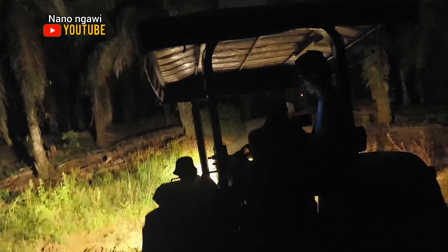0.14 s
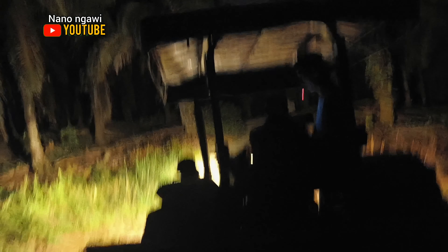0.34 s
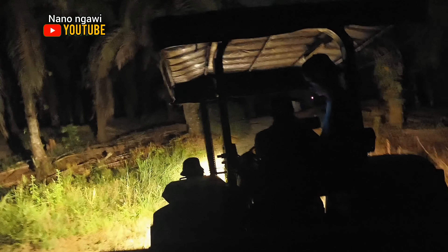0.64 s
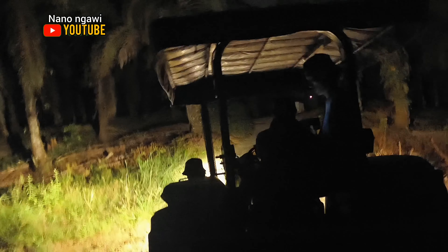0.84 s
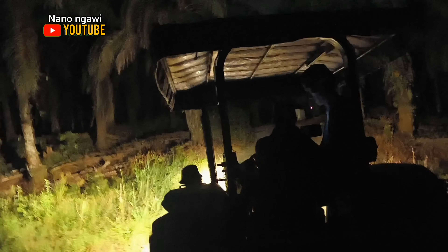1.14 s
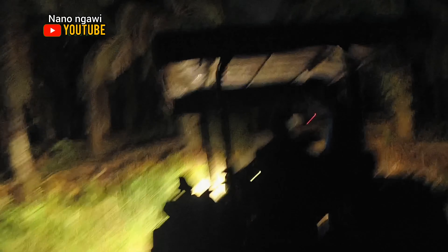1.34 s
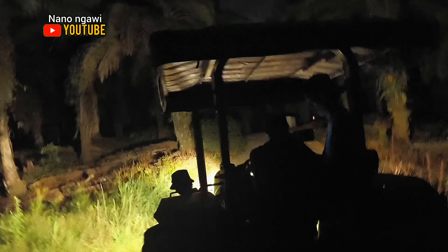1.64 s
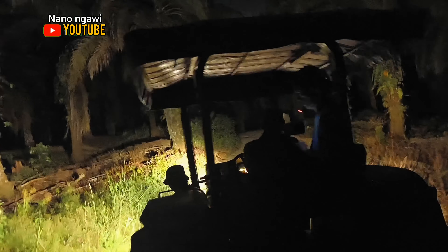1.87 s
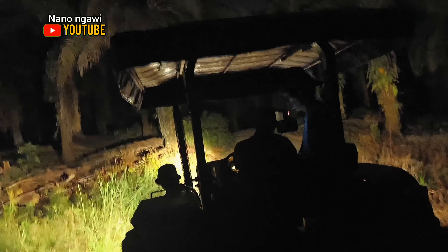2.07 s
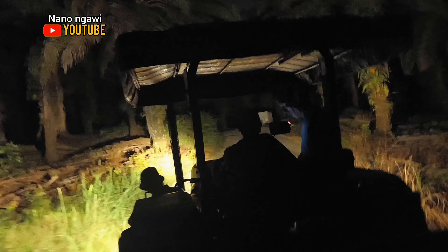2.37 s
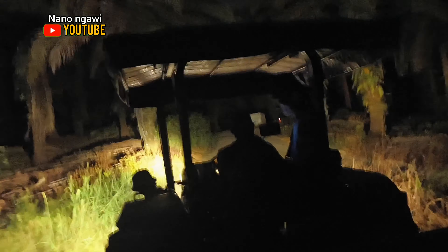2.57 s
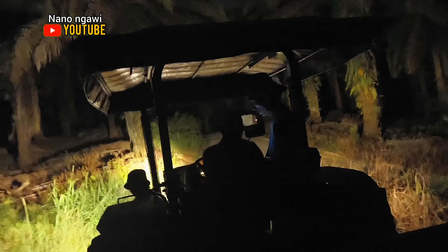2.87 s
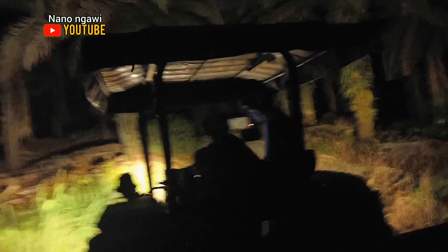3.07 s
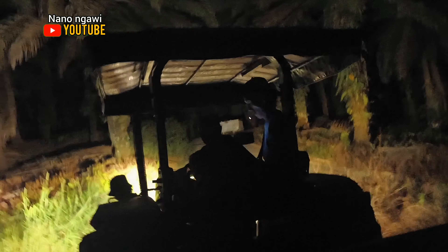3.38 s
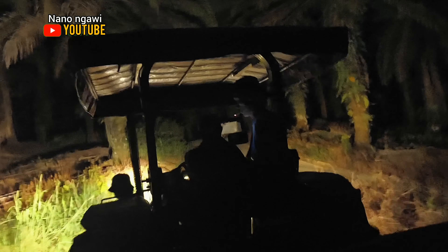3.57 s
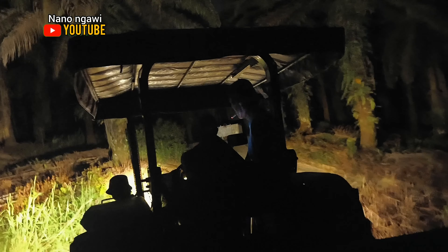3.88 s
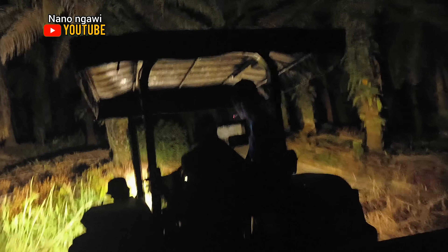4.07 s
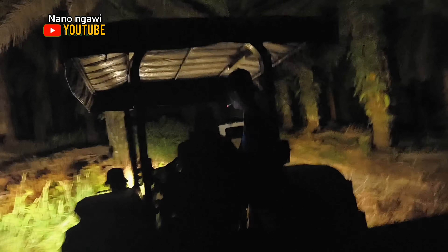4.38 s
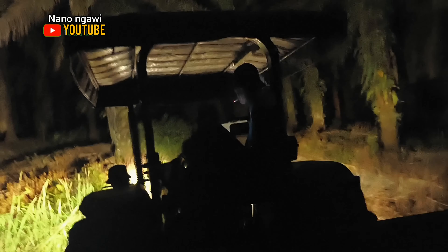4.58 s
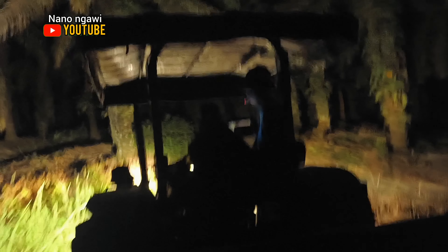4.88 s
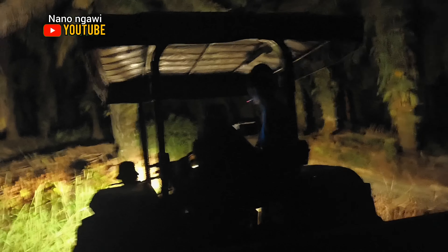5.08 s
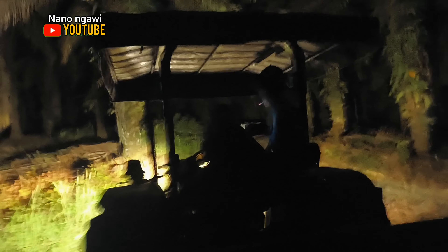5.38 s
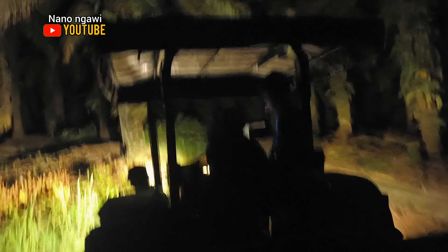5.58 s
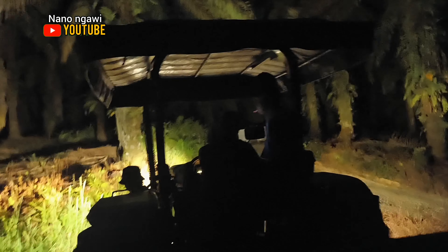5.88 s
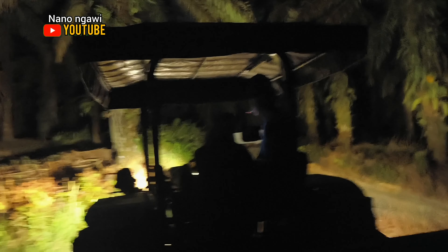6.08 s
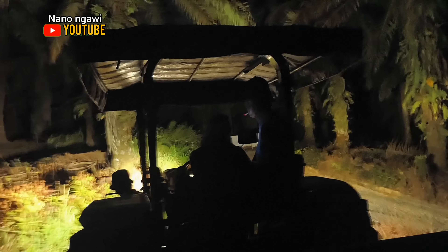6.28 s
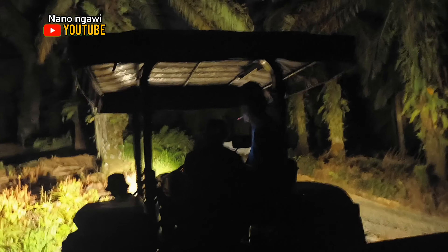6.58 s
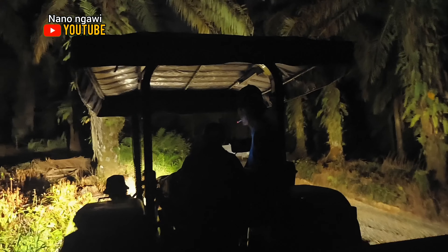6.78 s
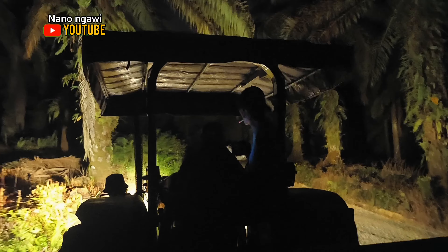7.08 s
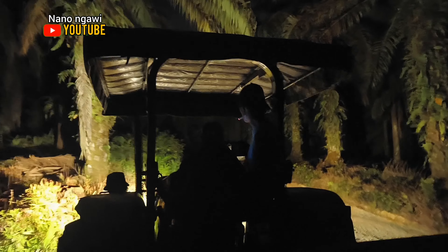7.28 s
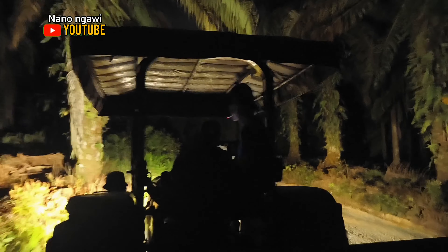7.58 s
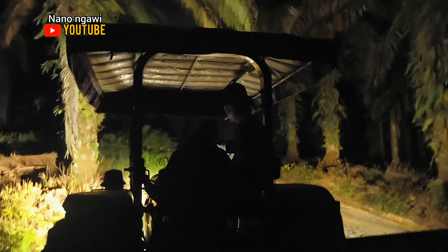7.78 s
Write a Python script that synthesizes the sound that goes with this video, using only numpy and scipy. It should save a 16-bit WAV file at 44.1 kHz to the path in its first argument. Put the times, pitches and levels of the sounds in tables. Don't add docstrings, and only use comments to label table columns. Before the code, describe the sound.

A night ride behind a diesel tractor on a rutted track, close stereo phone pickup on the trailer. A constant low engine throb with dull clatter underlies a swelling bed boom. Sudden thuds with sharp metallic knocks come early, sparser ones in the middle, the heaviest around four and a half seconds, and another just after six. Short squeaky scrapes and chain clicks fill gaps, with thin insect song barely audible above.

```python
import sys
import numpy as np
from scipy import signal
from scipy.fft import rfft, irfft, next_fast_len
from scipy.io import wavfile
from scipy.ndimage import uniform_filter1d

SR = 44100
rng = np.random.default_rng(int(sys.argv[2]) if len(sys.argv) > 2 else 0)


def voltage_ratio(decibels):
    exponent = np.asarray(decibels, float) / 20
    return 10 ** exponent


def unload_audio(sound):
    columns = np.transpose(np.atleast_2d(sound))
    steps = np.round(np.clip(columns, -1, 1) * 32767)
    wavfile.write(sys.argv[1], SR, steps.astype(np.int16))


N = 349713
PADDED = next_fast_len(N)
TIME = np.arange(N) / SR
HZ = np.maximum(np.fft.rfftfreq(PADDED, 1 / SR), 1)


def unit(x):
    return x / np.sqrt(np.mean(x ** 2))


def across(points):
    hz, value = np.transpose(points)
    return np.interp(np.log(HZ), np.log(np.maximum(hz, 1)), value)


def colour(x, points):
    return unit(irfft(rfft(x, PADDED) * voltage_ratio(across(points)), PADDED)[..., :N])


def ring(x, hz, t60):
    radius = np.exp(-np.log(1000) / (t60 * SR))
    angle = 2 * np.pi * hz / SR
    return signal.lfilter([0, np.sin(angle)], [1, -2 * radius * np.cos(angle), radius * radius], x)


def band(x, hz, width):
    return signal.lfilter(*signal.iirpeak(hz, hz / width, SR), x)


def walk(rate):
    hold = int(SR / rate)
    steps = np.repeat(rng.standard_normal(N // hold + 1), hold)
    return 1.287 * uniform_filter1d(uniform_filter1d(steps, hold), hold)[:N]


def noise():
    return rng.standard_normal((3, N))


def add(out, s, parts):
    hit = sum(voltage_ratio(db) * part / np.abs(part).max() for part, db in parts)
    i = int(s * SR)
    out[:, i:i + hit.shape[1]] += hit[:, :N - i]


# time in seconds, firing rate in Hz.
FIRING_RATE = [
    (0, 29.66),
    (1.5, 29.57),
    (3, 29.26),
    (4.5, 29.46),
    (6, 29.71),
    (7.93, 29.84),
]
# multiple of the firing rate, level in dB.
EXHAUST_ORDERS = [(1, -38), (2, -29), (3, -40), (4, -38), (6, -44), (10, -53.5), (15, -46.5)]
# frequency in Hz, width in Hz, level in dB.
CASING = [(432, 79, 0), (624, 88, -10), (865, 180, -0.5), (1244, 99, -1), (1412, 240, -3.5),
          (1893, 435, -12.5)]
# frequency in Hz, density in dB per Hz.
ENGINE_AIR = [(88, -28), (150, -1.5), (274, -6), (381, -1.5), (644, -14.5), (846, -8.5), (1070, -16),
              (1380, -12), (1640, -23), (3110, -31), (6380, -38.5), (8710, -37.5), (15600, -45.5)]
TAPPET_HZ, TAPPET_T60_S, TAPPET_DB, TAPPET_SCATTER_DB = 1399, .05, -49.5, 5


def engine():
    turns = np.cumsum(np.interp(TIME, *np.transpose(FIRING_RATE)) * (1 + 0.00605 * walk(6))) / SR
    firing = turns.astype(int)
    start = rng.random(len(EXHAUST_ORDERS))
    hum = sum(voltage_ratio(db + 2 + 2.46 * walk(5)) * np.sin(2 * np.pi * (order * turns + phase))
              for (order, db), phase in zip(EXHAUST_ORDERS, start))

    size = voltage_ratio(1.6 * rng.standard_normal(400))[firing]
    gate = 0.73 + size * np.exp(-(turns % 1) / 0.52)
    clatter = unit(sum(voltage_ratio(db + 1.3 * walk(13)) * band(band(gate * noise(), hz, width), hz, 3 * width)
                       for hz, width, db in CASING))
    air = colour(noise(), ENGINE_AIR) * voltage_ratio(.6 * walk(6.4) + .9 * walk(60))

    taps = np.diff(firing, prepend=0) * voltage_ratio(TAPPET_SCATTER_DB * rng.standard_normal(400))[firing]
    taps = signal.lfilter([1], [1, -np.exp(-1 / (0.0029 * SR))], taps) * noise()
    ping = voltage_ratio(TAPPET_DB) * unit(ring(taps, TAPPET_HZ, TAPPET_T60_S))
    return hum + ports(voltage_ratio(-39.5) * clatter + voltage_ratio(-36.5) * air + ping, turn=0)


# time in seconds, shaking of the bed in dB.
ROAD = [(0.0, -30), (0.09, -25), (0.44, -22), (0.51, -11), (0.82, -19.5), (1.72, -18.5), (1.79, -29.5),
        (1.87, -22), (2.3, -26.5), (3.8, -25.5), (3.95, -18.5), (4.02, -28.5), (4.42, -14), (5.12, -26),
        (6.12, -18.5), (6.16, -13), (6.47, -22), (7.93, -27)]
# frequency in Hz, density in dB per Hz.
BED = [(12, -38), (20, -2.5), (49, 1.5), (70, 6.5), (106, -1.5), (140, -14), (200, -13), (260, -18.5),
       (440, -120)]
# frequency in Hz, density in dB per Hz.
PANELS = [(76, -43), (130, -1.5), (177, 0), (250, -9), (294, -3.5), (367, -7.5), (618, -10), (1130, -22.5),
          (1220, -31), (2500, -41.5), (3250, -53), (5500, -120)]
# start in seconds, slam in dB, boom in Hz, boom in dB, slam t60 in seconds.
LANDINGS = [(0.503, -9.5, 64, -2, 0.27), (0.538, -16, 94.5, -2.5, 0.29), (0.589, -29, 98.7, -1.5, 0.15),
            (0.631, -27, 70.5, -16, 0.22), (1.038, -11, 70.6, -9.5, 0.32),
            (1.366, -8.5, 104.4, -10.5, 0.32), (1.556, -15.5, 89, -7.5, 0.19),
            (1.933, -18.5, 67.7, -14, 0.3), (2.744, -16.5, 90, -29, 0.19), (4.193, -13.5, 65, -11, 0.27),
            (4.386, -5.5, 67, -4, 0.32), (4.428, -19, 57, -32, 0.25), (4.554, -13.5, 68.3, -9, 0.13),
            (4.708, -12.5, 76.6, -16, 0.18), (5.387, -19, 72, -25, 0.15), (5.981, -15, 63.5, -11.5, 0.22),
            (6.171, -11, 61.3, -3, 0.19), (6.218, -34, 106, -10, 0.25)]
QUIET_ROAD_DB, DRUM_DB, DRUM_SHARE = -24.5, -38, 0.74
AFTERSHAKE_DB, AFTERSHAKE_T60_S = -9.5, 0.83
BED_LIMIT_DB, LUMPS_DB = -11.5, 1.4


def trailer():
    shake_db = np.interp(TIME, *np.transpose(ROAD))
    boom = colour(noise(), BED) * voltage_ratio(np.minimum(shake_db, BED_LIMIT_DB) + LUMPS_DB * walk(9))
    power = voltage_ratio(DRUM_DB + DRUM_SHARE * (shake_db - QUIET_ROAD_DB)) ** 2
    blows = np.zeros(N)
    for s, db, *_ in LANDINGS:
        blows[int((s + .004) * SR)] = voltage_ratio(db + AFTERSHAKE_DB) ** 2
    fading = signal.lfilter([1], [1, -voltage_ratio(-60 / (AFTERSHAKE_T60_S * SR)) ** 2], blows)
    power = power + np.abs(uniform_filter1d(fading, int(0.0074 * SR)))
    return boom + colour(noise() * voltage_ratio(1.58 * walk(40)), PANELS) * np.sqrt(power)


# frequency in Hz, level in dB, t60 in seconds.
FLOOR_PLATE = [(172.6, -2, 0.086), (215, 2, 0.14), (296, 8.5, 0.1), (352, -20, 0.028), (442, -5, 0.17),
               (527, 3.5, 0.098), (629, 3.5, 0.12), (816, -21, 0.13), (1040, 6, 0.034)]


def thuds():
    out = np.zeros((3, N))
    t = np.arange(int(.5 * SR)) / SR
    for s, db, hz, boom_db, t60 in LANDINGS:
        rattle = rng.standard_normal((3, len(t))) * np.minimum(t / 0.0031, 1) * voltage_ratio(-60 * t / t60)
        luck = rng.standard_normal(len(FLOOR_PLATE))
        slam = sum(voltage_ratio(gain + 2 * a) * ring(rattle, mode_hz, decay)
                   for (mode_hz, gain, decay), a in zip(FLOOR_PLATE, luck))
        boom = np.sin(2 * np.pi * hz * t) * np.minimum(t / 0.0135, 1) * voltage_ratio(-60 * t / 0.2) * np.ones((3, 1))
        add(out, s - .004, [(slam, db - 2.5)])
        add(out, s - .013, [(boom, boom_db - 2.5)])
    return out


# start in seconds, peak in dB, clunk in dB, pin pitch in Hz, ring in dB.
KNOCKS = [(0.4995, -13.5, 2, 3700, -2), (0.5234, -20, 7.5, 3400, -10), (1.034, -15, -3.5, 4010, -4),
          (1.3645, -10, -5.5, 3390, -8), (1.507, -22.5, -2.5, 3530, 1), (1.7, -33.5, 1, 3780, -8),
          (1.931, -24, -4, 3450, -3), (2.747, -22.5, -1, 3620, 2), (3.4343, -30.5, 2, 3400, 0),
          (4.1914, -17.5, -3, 3820, -1), (4.382, -9, -6.5, 3890, -12), (4.5523, -16.5, -10, 3830, -4),
          (4.703, -17, -2, 3840, -3), (5.3834, -23.5, -5, 3460, -8), (5.982, -23, 1, 3430, 3.5),
          (6.1729, -13, -2.5, 3840, 4.5), (6.3662, -24, -0.5, 3470, -2)]
# share of the pin pitch, level in dB, t60 in seconds.
PIN_MODES = [
    (.9, -19.5, 0.092),
    (1, 3.5, 0.3),
    (1.13, -10, 0.077),
    (1.45, -10, 0.13),
]
# frequency in Hz, level in dB, t60 in seconds.
DRAWBAR = [
    (652, 4, 0.15),
    (1306, -2.5, 0.082),
    (1754, 16.5, 0.025),
    (2040, 2.5, 0.094),
]
# frequency in Hz, density in dB per Hz.
CRACK = [(530, -15), (900, 2.5), (1300, -4.5), (1900, -5.5), (2630, -5.5), (3600, 1.5), (3890, -3.5),
         (4830, -19), (6060, -16), (7210, -34), (9660, -26), (12000, -43), (15600, -67), (22000, -120)]
KNOCK_T60_S, PIN_DAMPING, BAR_DAMPING = 0.16, .075, 0.35


def hitch():
    out = np.zeros((3, N))
    t = np.arange(int(.3 * SR)) / SR
    grain = colour(noise(), CRACK)
    later = np.maximum(t - .032, 0)
    blow = np.minimum(t / 0.0068, 1) ** 2 * voltage_ratio(-60 * np.maximum(t - .012, 0) / KNOCK_T60_S)
    rebound = voltage_ratio(-42) * np.minimum(later / 0.0098, 1) * voltage_ratio(-60 * later / KNOCK_T60_S)
    push = blow + rebound
    for s, db, clunk_db, pin_hz, ring_db in KNOCKS:
        chatter = rng.standard_normal((3, len(t))) * push
        luck = rng.standard_normal((2, 4))
        tap = chatter * voltage_ratio(-60 * t / 0.071)
        pin = sum(voltage_ratio(gain + 2 * a) * ring(tap, pin_hz * (share + 0.0078 * b), decay * PIN_DAMPING)
                  for (share, gain, decay), a, b in zip(PIN_MODES, *luck))
        bar = sum(voltage_ratio(gain) * ring(chatter, hz, decay * BAR_DAMPING) for hz, gain, decay in DRAWBAR)
        i = int(s * SR)
        crack = grain[:, i:i + len(t)] * push
        clash = band(chatter * voltage_ratio(-60 * t / 0.074), 5460, 1800)
        add(out, s - .005, [(pin, db + ring_db), (crack, db - 2.5), (clash, db - 7.5), (bar, db + clunk_db)])
    return signal.sosfilt(signal.butter(2, 7500, fs=SR, output="sos"), out)


BITE_DB_PER_S, LET_GO_DB_PER_S, NICK_LET_GO_DB_PER_S = 2200, 798, 1800
SETTLE_DB, SETTLE_DB_PER_S = -17, 150


def slide(t, length, db, swell_db, let_go):
    held = db - max(swell_db, 0) + swell_db * np.clip(t / length, 0, 1)
    after = np.maximum(t - length, 0)
    fall = np.maximum(-let_go * after, SETTLE_DB - SETTLE_DB_PER_S * after)
    return voltage_ratio(held + fall + BITE_DB_PER_S * np.minimum(t, 0))


# start in seconds, length in seconds, loudest hiss in dB,
# swell from start to end in dB, squeak above the hiss in dB.
SCRAPES = [(0.292, 0.077, -42.5, -7, -4.5), (0.642, 0.046, -31.5, 21, -7), (0.699, 0.089, -31.5, -14.5, -6),
           (1.204, 0.106, -43, 2, -6), (1.624, 0.048, -45.5, 7, -2.5), (2.155, 0.031, -41, -1, -1),
           (2.455, 0.052, -41.5, -11, -4.5), (2.932, 0.035, -41.5, 26, 1), (3.817, 0.043, -42, 13, -2.5),
           (4.076, 0.063, -45, -6.5, 3.5), (4.238, 0.013, -40, 21, -6), (4.748, 0.049, -33, 4, -2),
           (5.203, .024, -32.5, 27, -13.5), (5.701, 0.06, -33, 11, -2), (6.13, 0.042, -46.5, 14, 1.5),
           (6.201, 0.032, -32.5, 2.5, -6), (6.639, 0.019, -35, 14, -7), (7.013, 0.024, -46, 17, -0.5),
           (7.347, 0.078, -47, 4.5, -3), (7.398, 0.0099, -35.5, 15, -18), (7.675, 0.087, -42, -6.5, -6),
           (7.809, 0.011, -32.5, 8, -3.5)]
# start in seconds, hiss in dB.
NICKS = [(.408, -51), (.87, -51), (.995, -49), (1.775, -56), (2.045, -50), (2.58, -48), (2.66, -48.5),
         (2.818, -43.5), (3.03, -43), (3.29, -51), (3.355, -50.5), (3.53, -49), (3.94, -60), (4.29, -49),
         (4.655, -46.5), (5.195, -41.5), (5.937, -45), (6.28, -47), (6.55, -64), (6.825, -61), (7.595, -51),
         (7.63, -57), (7.65, -72), (7.778, -42.5)]
# frequency in Hz, density in dB per Hz.
GRIT = [(1350, -50), (2300, -46), (3040, 1.5), (4510, 0), (4880, -3), (5690, -0.5), (6780, -5), (7840, 4.5),
        (8490, -4), (9810, -5.5), (15600, -21)]
NICK_S, NICK_SQUEAK_DB = 0.0017, -6
GRAINS_PER_S, GRAIN_SPREAD_DB, PATCHY_DB = 900, 4, 5


def scrapes():
    hiss, squeak = np.zeros((2, N))
    nicks = [(s, NICK_S, db, 0, NICK_SQUEAK_DB) for s, db in NICKS]
    for s, length, db, swell_db, squeak_db in [*SCRAPES, *nicks]:
        on = slice(int((s - .03) * SR), int((s + .45) * SR))
        let_go = LET_GO_DB_PER_S if swell_db else NICK_LET_GO_DB_PER_S
        rub = slide(TIME[on] - s, length, db, swell_db, let_go)
        hiss[on] = np.maximum(hiss[on], rub)
        squeak[on] = np.maximum(squeak[on], rub * voltage_ratio(squeak_db))

    grain_size = voltage_ratio(GRAIN_SPREAD_DB * np.minimum(rng.exponential(size=N), 2))
    grains = (rng.random(N) < GRAINS_PER_S / SR) * grain_size
    grains = signal.lfilter([1], [1, -np.exp(-1 / (0.00045 * SR))], grains)
    slip = noise() * voltage_ratio(1.3 * walk(400) + 1.2 * walk(110)) * (1 + voltage_ratio(-10.5) * grains)
    plate = unit(band(slip, 1845, 70) + 1.17 * band(slip, 2026, 58) + 0.59 * band(slip, 1660, 850))

    grit = rfft(colour(slip, GRIT), PADDED)
    patches = np.zeros((3, N))
    for hz in 2000 * 2. ** np.arange(4):
        octave = np.clip(1 - np.abs(np.log(HZ / hz)) / np.log(2), 0, 1)
        patches += voltage_ratio(PATCHY_DB * walk(45)) * irfft(grit * octave, PADDED)[:, :N]
    return voltage_ratio(2.0) * hiss * unit(patches) + voltage_ratio(10.5) * squeak * plate


# start in seconds, peak in dB, pitch in Hz.
TICKS = [(0.6394, -33, 2030), (0.9194, -35, 1570), (2.5437, -28, 1530), (2.5794, -38, 1720),
         (2.9254, -33, 1500), (3.2051, -41, 1824), (4.188, -25, 3800), (5.3, -32, 1540),
         (6.0427, -42, 1520), (6.8219, -31, 1540), (7.5946, -43, 1530), (7.8111, -17, 2110)]


def ticks():
    out = np.zeros((3, N))
    t = np.arange(int(0.033 * SR)) / SR
    for s, db, hz in TICKS:
        touch = rng.standard_normal((3, len(t))) * voltage_ratio(-60 * t / 0.064)
        add(out, s - .001, [(band(touch, 5000, 9000), db - 11.0), (band(touch, hz, 500), db - 5.5)])
    return out


# time in seconds, level in dB.
SONG = [(0.0, -64), (0.26, -67), (0.82, -60), (1.52, -58), (1.7, -65), (3.97, -59.5), (4.24, -57.5),
        (5.52, -62), (6.4, -59.5), (7.13, -60.5), (7.93, -59)]


def insects():
    low = band(noise(), 7960, 450) * voltage_ratio(4.5 * walk(98))
    high = voltage_ratio(-14.0) * band(noise(), 12100, 300) * voltage_ratio(3.0 * walk(30))
    return voltage_ratio(np.interp(TIME, *np.transpose(SONG)) - 1.5) * unit(low + high)


# frequency in Hz, shared part of the power from 0 to 1.
LIKENESS = [(25, .965), (60, .982), (150, .95), (300, .74), (1500, .62), (2600, .45), (12000, .38)]
# frequency in Hz, left minus right in dB.
LEFT = [(60, 0), (110, -0.5), (200, -0.5), (380, -2.5), (700, 0), (1290, -2.5), (2380, -4.5), (4400, 1.5),
        (8120, -2), (15000, 1)]
# frequency in Hz, lead of the left in radians.
LEAD = [(0, 20), (340, -2.6), (1550, 1.4), (2150, 1.1), (2670, -4), (3360, -4), (4130, -5.5), (5250, -7.5),
        (5600, -12), (6800, -8.5), (8700, -11.5), (10100, -18), (14000, -8), (15300, -13)]


def ports(three, turn=1):
    share = np.clip(across(LIKENESS), 0, 1)
    shared = rfft(three[0], PADDED) * np.sqrt(share)
    own = rfft(three[1:], PADDED) * np.sqrt(1 - share)
    sides = np.array([[.5], [-.5]])
    both = shared * np.exp(1j * turn * across(LEAD) * sides) + own
    return irfft(both * voltage_ratio(across(LEFT) * sides), PADDED)[:, :N]


def scene():
    bed = ports(trailer() + thuds(), turn=0)
    return engine() + bed + ports(hitch() + scrapes() + ticks() + insects())


def low_pass(x):
    return signal.sosfilt(signal.butter(12, 15760, fs=SR, output="sos"), x)


def record(dry):
    rounded = np.tanh(.8 * dry) / .8
    mix = signal.sosfilt(signal.ellip(8, .2, 60, 15750, fs=SR, output="sos"), rounded)
    return low_pass(mix)


dry = scene()
out = record(dry)
unload_audio(out)
```